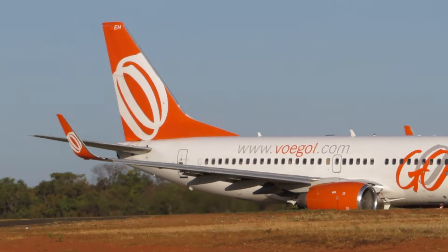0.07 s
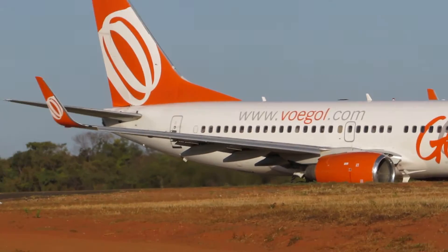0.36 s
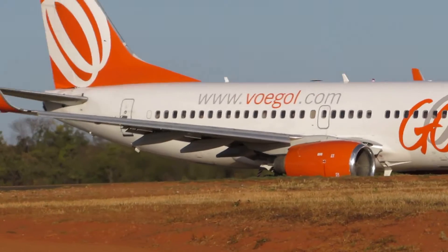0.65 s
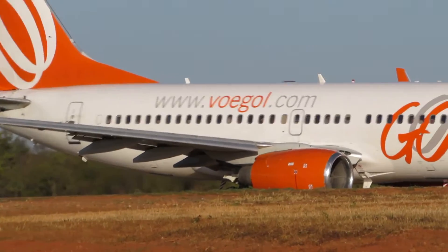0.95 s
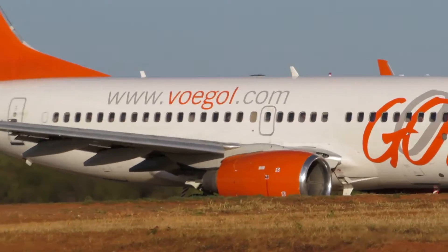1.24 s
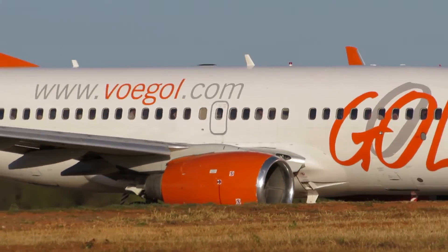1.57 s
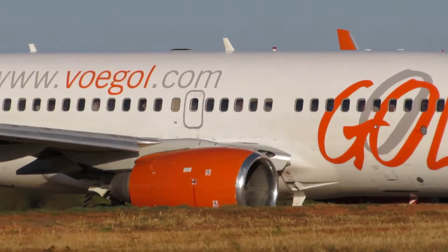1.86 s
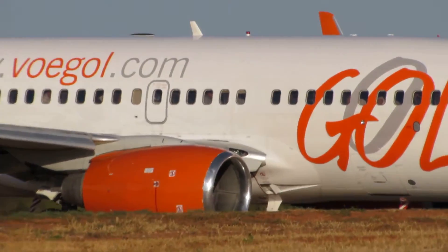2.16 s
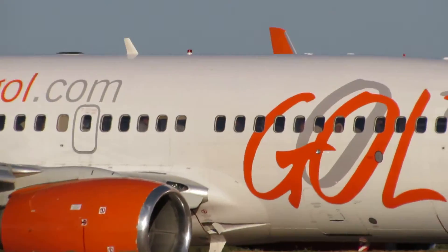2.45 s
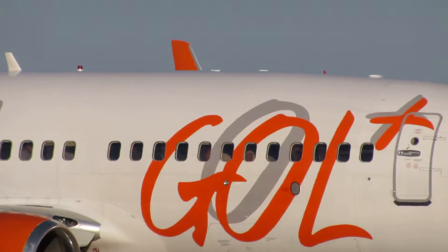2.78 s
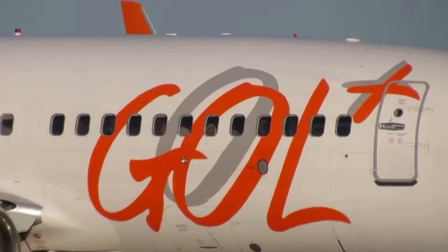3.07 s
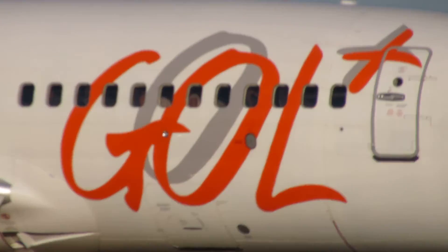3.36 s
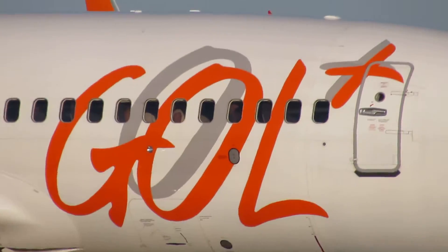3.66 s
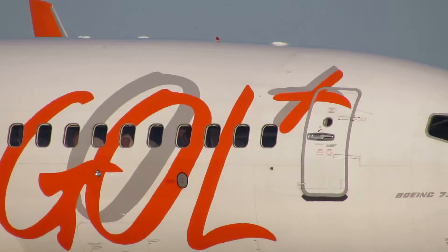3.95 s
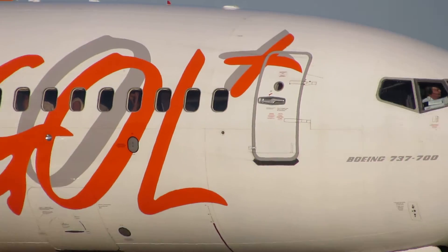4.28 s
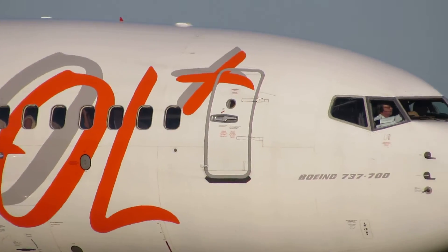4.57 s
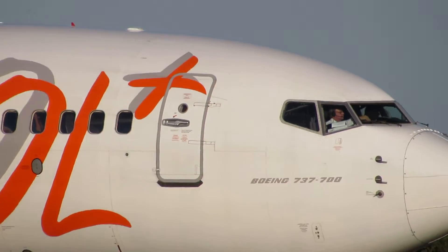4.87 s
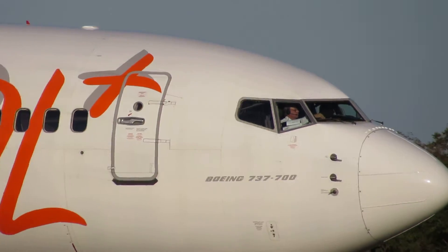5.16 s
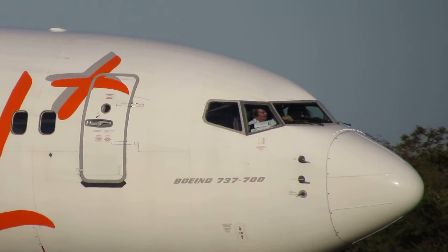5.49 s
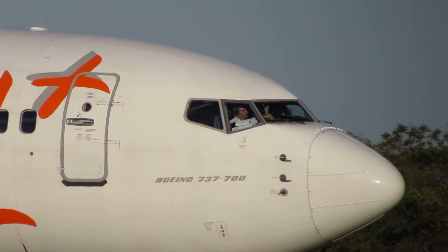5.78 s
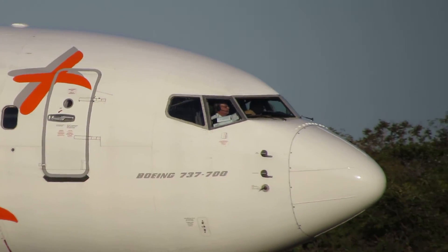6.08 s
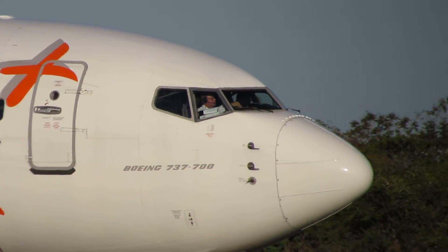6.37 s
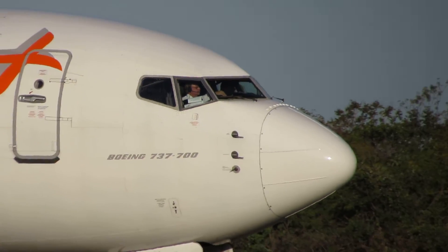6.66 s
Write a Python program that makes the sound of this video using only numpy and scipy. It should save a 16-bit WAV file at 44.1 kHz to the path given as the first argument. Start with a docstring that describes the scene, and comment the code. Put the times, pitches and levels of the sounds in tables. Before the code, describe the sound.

On an open airfield, a distant jet airliner roars with a faint turbine whine as gusts buffet a hand-held camera's microphone. The zoom motor whirrs and ticks close by. About three seconds in, two sharp clacks stop the motor and make the level drop suddenly. The sound creeps back with a few faint taps, a breathy fan howl crests, and the roar sinks under fresh gusts.

```python
"""On an airfield, a distant jet airliner heard through the two microphone ports of a hand-held camera.
From the start the engines roar under a faint turbine whine, gusts buffet the ports, and the zoom motor
whirrs and ticks close by. At 3.1 s a sharp clack makes the gain control duck; at 3.3 s a second one
stops the motor. The level creeps back as a loose part taps lightly. The fans' howl crests near 5.3 s,
then the roar sinks under fresh gusts and a few tiny high ticks."""
import sys
import numpy as np
from scipy import signal
from scipy.fft import rfft, irfft, next_fast_len
from scipy.io import wavfile
from scipy.ndimage import uniform_filter1d, map_coordinates

SR = 44100
rng = np.random.default_rng(int(sys.argv[2]) if len(sys.argv) > 2 else 0)


def transcribe(signal):
    """Save signal, clipped to [-1, 1], as a 16-bit WAV file at the path in sys.argv[1]."""
    frames = np.atleast_2d(signal).T
    limited = np.clip(frames, -1, 1)
    pcm = np.round(limited * 32767).astype(np.int16)
    wavfile.write(sys.argv[1], SR, pcm)


N = 301203


def amp(db):
    """Decibels to gain."""
    return 10 ** (np.asarray(db) / 20)


def unit(x):
    """Scale to rms 1."""
    return x / np.sqrt(np.mean(x ** 2) + 1e-20)


def along(points, hz):
    """Read (Hz, value) points on a log frequency axis."""
    freqs, values = np.transpose(points)
    return np.interp(np.log(hz + 1), np.log(freqs + 1), values)


def curve(points):
    """Join (seconds, value) points into one value per sample."""
    return np.interp(np.arange(N) / SR, *np.transpose(points))


def wobble(rate):
    """A smooth random curve, rate knots a second."""
    return map_coordinates(rng.standard_normal(int(N * rate / SR) + 4), [np.arange(N) * rate / SR])


def filtered(x, response):
    """Shape x by a gain that is a function of Hz."""
    size = next_fast_len(N + SR // 2)
    return irfft(rfft(x, size) * response(np.fft.rfftfreq(size, 1 / SR)), size)[..., :N]


def pan(side_db):
    """Left and right gains for a level difference, left over right."""
    side_db = np.atleast_1d(side_db)
    return amp(np.array([side_db, -side_db]) / 2)


def noise(patchy_db):
    """White noise with drifting patches of gain."""
    cells = signal.stft(rng.standard_normal(N), nperseg=512)[2]
    patches = uniform_filter1d(rng.standard_normal(cells.shape), size=4, axis=0)
    patches = unit(uniform_filter1d(patches, size=16, axis=1))
    return signal.istft(cells * amp(patchy_db * patches), nperseg=512)[1][:N]


def stereo_noise(spectrum, width, locked, patchy_db):
    """Noise of rms 1; a locked share of the side lags the mid a quarter cycle, so the right port leads."""
    common = noise(patchy_db)
    lagging = np.imag(signal.hilbert(common, next_fast_len(N)))[:N]
    apart = np.sqrt(locked) * lagging + np.sqrt(1 - locked) * noise(patchy_db)
    mid = filtered(common, lambda hz: amp(along(spectrum, hz)))
    side = filtered(apart, lambda hz: amp(along(spectrum, hz) + along(width, hz)))
    return unit(np.array([mid + side, mid - side]))


def coloured(x, resonances):
    """Peaks and dips, heard differently at each port."""
    def response(hz):
        return amp(sum(np.outer([left_db, right_db], 1 / (1 + (2 * (hz - centre) / width) ** 2))
                       for centre, width, left_db, right_db in resonances))
    return filtered(x, response)


def add(track, start, sound):
    """Mix a short sound in at start seconds."""
    part = track[..., round(start * SR):][..., :sound.shape[-1]]
    part += sound[..., :part.shape[-1]]


# The roar swelling and sinking across the airfield. Each row: time in seconds, swell in dB.
ROAR_SWELL = [(0.1, -4), (0.36, -0.2), (0.72, -1.64), (1.48, 0.5), (1.98, -1.5), (2.35, 0), (2.95, 0),
              (3.6, 0.5), (4.05, -4), (4.5, -4.6), (4.85, -2.5), (5.27, -1), (5.45, -2.5), (5.78, -7),
              (6.05, -8), (6.52, -5.5), (6.8, -8)]
# Exhaust rumble and jet rush from afar. Each row: frequency in Hz, relative density in dB.
RUMBLE_SPECTRUM = [(13, -42.5), (22, -24), (59, -3), (90, -4), (122, -1), (193, -3), (332, -11.5),
                   (364, -15.5), (520, -28), (680, -56), (1140, -120)]
RUSH_SPECTRUM = [(240, -29), (400, -6.5), (450, -4), (514, -2.5), (744, 2.5), (916, -8.5), (1190, -5),
                 (1860, -16), (2040, -14), (3030, -23), (3960, -32), (4260, -27.5), (5900, -31),
                 (8060, -40.5), (13700, -50)]
# Their stereo width at the microphone. Each row: frequency in Hz, side over mid in dB.
RUMBLE_WIDTH = [(50, -24.5), (150, -14), (400, 6.5)]
RUSH_WIDTH = [(400, 3), (640, -2), (820, 7), (1150, -1), (1420, -1.5), (1780, 8.5), (2080, 8), (2300, 5),
              (3250, 11), (3550, 9.5), (4300, 0.5), (6000, 0.5), (9000, -1)]
# The rush arrives from the right. Each row: frequency in Hz, left over right in dB.
RUSH_PAN = [(450, -8.5), (750, 3.5), (1100, 0.5), (1600, -2), (2600, -6), (3200, -4.5), (4200, -3.5),
            (9000, 0)]
# The camera's body colours the rush. Each row: centre and width in Hz, left and right lift in dB.
BODY_RESONANCES = [(583, 74, 1.5, 2.5), (676, 90, -3.5, 0.5), (1160, 220, -3, 3.5), (1430, 100, 0.5, 1.5),
                   (1710, 420, 3.5, 0), (1920, 280, -4, -2), (2300, 150, 1.5, -0.5), (2540, 200, -5.5, 0.5),
                   (2760, 160, 2, 1), (3060, 160, 4, 3), (3226, 160, -13, -6), (3510, 200, 4.5, 2),
                   (4060, 180, 4, 2), (5170, 300, -3, 0)]


def engines(rumble_db=-21.5, rush_db=-27, rumble_swing=1.51, dulling=0.52, clear_db=-2):
    """Distant exhaust rumble and jet rush; the air carries the treble better when the rush swells."""
    swell_db = curve(ROAR_SWELL)
    rumble_gain = amp(rumble_db + rumble_swing * swell_db + 0.9 * wobble(10))
    rumble = stereo_noise(RUMBLE_SPECTRUM, RUMBLE_WIDTH, locked=0.61, patchy_db=-0.17)
    rush = stereo_noise(RUSH_SPECTRUM, RUSH_WIDTH, locked=0.54, patchy_db=1.0)
    treble = filtered(rush, lambda hz: hz ** 2 / (hz ** 2 + 2400 ** 2))
    treble_gain = amp(dulling * np.minimum(swell_db - clear_db, 0))
    rush = rush + treble * (treble_gain - 1)
    rush = filtered(rush, lambda hz: pan(along(RUSH_PAN, hz)))
    rush_gain = amp(rush_db + swell_db + 0.41 * wobble(15) + 0.59 * wobble(90))
    return rumble_gain * rumble + rush_gain * coloured(rush, BODY_RESONANCES)


# Far-off turbine tones, a little to the right. Each row: pitch in Hz, relative level in dB,
# swing in dB per dB of the roar's swell, slow wander in Hz.
TURBINE_TONES = [(2260, -66.5, 2.5, 16), (2690, -52, 4, 22), (3094, -61, 2, 24), (5600, -70.5, 1.3, 3.5),
                 (6013, -67, 1.25, 4), (6700, -72, .9, 4)]


def turbine_whine(gain_db=8.5, right_lead_rad=2.15):
    """Blade tones, wavering and fading in the turbulent air."""
    swell_db = curve(ROAR_SWELL)
    waver = 1 + 0.0004 * wobble(3) + 0.00093 * wobble(70)
    tones = np.zeros((2, N))
    for hz, db, swing, wander_hz in TURBINE_TONES:
        pitch_hz = hz * waver + wander_hz * wobble(1.8) + 9 * wobble(60)
        phase = 2 * np.pi * np.cumsum(pitch_hz) / SR
        gain = amp(db + swing * swell_db + 1.3 * wobble(7.3))
        tones += gain * np.sin([phase, phase + right_lead_rad])
    return tones * amp(gain_db) * pan(-2)


# Gusts right on the microphone. Each row: start and length in seconds, strength over the breeze
# in dB, left over right in dB.
WIND_GUSTS = [(-.08, 0.034, 19.5, 9.5), (0.275, 0.46, 16, 9.5), (0.657, 0.093, 16.5, 16.5),
              (.85, 1.38, 15, 7.5), (2.35, 0.81, 13, 2), (4.128, 0.32, 15, -3.5), (4.5, 1, 12.5, -1),
              (5.216, 1.13, 19.5, -3), (6.417, 0.54, 19.5, -2.5)]


def gusts(attack_s=0.053, release_s=0.29):
    """Wind strength and left-right lean in dB; gusts rise, hold and die away, and the strongest leads."""
    t = np.arange(N) / SR
    start, length, db, side_db = np.transpose(WIND_GUSTS)[:, :, None]
    rise = np.clip((t - start) / attack_s, 0, 1)
    fall = np.exp(-np.maximum(t - start - length, 0) / release_s)
    push = amp(db) * rise * fall
    strength_db = 10 * np.log10(1 + np.max(push, axis=0) ** 2)
    lean_db = np.sum(push * side_db, axis=0) / (1 + np.sum(push, axis=0))
    return strength_db, lean_db


# Single eddies striking the ports. Each row: time in seconds, buffet lift in dB, flutter lift in dB.
PORT_EDDIES = [(.37, -2, 10.5), (.56, 8.5, 2), (1.0, 3, 6), (1.45, 8, 10), (2.32, -2, 13), (2.46, 11, 0),
               (3.075, 0.5, 10), (4.295, 4.5, -3.5), (4.495, 5, 7), (5.33, 8, -7), (5.39, 1, 0),
               (5.455, 6, -1), (5.54, 13.5, 4), (5.6, 7, 7), (5.713, -2, 11), (5.81, 0, 4.5),
               (5.878, 6, 8.5), (5.955, -4, 7.5), (6.05, -3, 8.5), (6.16, -5, 0), (6.24, -2, 7.5),
               (6.295, 11, 2), (6.48, 11, -3), (6.545, 2, 6.5), (6.62, -4, 2), (6.755, 11, 8.5),
               (6.82, 2, 9)]


def eddies(half_passage_s=0.015):
    """Brief lifts in dB of the buffeting and of the flutter as each eddy passes."""
    times, *lifts_db = np.transpose(PORT_EDDIES)
    passing = np.exp(-((np.arange(N) / SR - times[:, None]) / half_passage_s) ** 2)
    return np.array(lifts_db) @ passing


# Wind noise made at the ports themselves. Each row: frequency in Hz, relative density in dB.
BUFFET_SPECTRUM = [(15, -5.5), (30, -14.5), (65, -2), (110, -0.5), (170, -22.5), (400, -39), (1000, -100)]
FLUTTER_SPECTRUM = [(50, -30), (130, -2.5), (200, 3), (330, -4), (600, -15.5), (1200, -36.5), (3000, -79),
                    (8000, -73)]
# Its stereo width. Each row: frequency in Hz, side over mid in dB.
WIND_WIDTH = [(30, 19), (300, 13.1), (1000, 9.8)]


def wind(buffet_lull_db=-38.5, flutter_lull_db=-56.5, flutter_growth=1.78):
    """Slow eddies thump the ports in opposite phase; faster air adds a higher flutter."""
    gust_db, lean_db = gusts()
    thump_db, flap_db = eddies()
    buffet_gain = amp(buffet_lull_db + gust_db + thump_db + 0.77 * wobble(35))
    buffet = stereo_noise(BUFFET_SPECTRUM, WIND_WIDTH, locked=0, patchy_db=1.0)
    flutter_gain = amp(flutter_lull_db + flutter_growth * gust_db + flap_db + 0.54 * wobble(25))
    flutter = stereo_noise(FLUTTER_SPECTRUM, WIND_WIDTH, locked=0.1, patchy_db=-0.5)
    return (buffet_gain * buffet + flutter_gain * flutter) * pan(lean_db)


# The zoom motor, in the same body as the microphone. Each row: time in seconds, relative level in dB.
MOTOR_LEVEL = [(.06, -43), (.33, -39), (.95, -40), (1.35, -35.5), (2.0, -37.5), (3.1, -38.5)]
# Its gear noise. Each row: frequency in Hz, relative density in dB.
MOTOR_SPECTRUM = [(220, -3), (320, 14.5), (420, 10), (800, 5.5), (1100, -8), (1500, 7.5), (2800, -2.5),
                  (4200, -16.5), (7200, -14.5), (8800, -20), (9800, -17.5), (11300, -27), (14000, -37.5)]
# Its stereo width. Each row: frequency in Hz, side over mid in dB.
MOTOR_WIDTH = [(400, 8.7), (1100, 6.2), (1800, 6.4), (3500, 1.8), (4500, 5.6), (9000, 0.5)]
# It is mostly louder at the left port. Each row: frequency in Hz, left over right in dB.
MOTOR_PAN = [(1000, 8), (2500, -3.5), (4500, 8.5), (8500, 13.5), (11000, 1.5)]


def zoom_motor(turn_hz=39.9, stop_s=3.287, gain_db=8.0):
    """Gear noise that throbs with each turn, until the lever is let go."""
    t = np.arange(N) / SR
    angle = 2 * np.pi * turn_hz * t
    throb = 1 + 0.083 * np.sin(angle) - 0.13 * np.cos(2 * angle)
    running = np.clip((stop_s - t) / 0.0057, 0, 1)
    whirr = stereo_noise(MOTOR_SPECTRUM, MOTOR_WIDTH, locked=0.39, patchy_db=1.5)
    whirr = filtered(whirr, lambda hz: pan(along(MOTOR_PAN, hz)))
    return amp(curve(MOTOR_LEVEL) + gain_db) * throb * running * whirr


# The lens mechanism catching, close to the ports. Each row: start in seconds, relative level in dB.
LENS_CATCHES = [(.005, -18), (0.2892, -31), (.4145, -26), (0.54, -24.5), (0.567, -32), (.6649, -28),
                (0.6905, -30), (.7911, -26.5), (.8116, -28), (1.494, -26), (1.667, -22.5), (1.6931, -26),
                (2.167, -22.5), (2.1935, -27), (2.2658, -15), (2.417, -19), (2.4755, -25), (2.5432, -16.5),
                (2.6063, -22.5), (2.6687, -12.5), (2.743, -25), (2.7931, -15)]
# The tone all catches share. Each row: frequency in Hz, gain in dB.
CATCH_TONE = [(300, -58), (1450, 13.5), (2200, 0.5), (3100, 4.5), (4200, -2), (5300, -3), (6500, -3),
              (7700, 1), (12000, -19), (15000, -30.5)]
# They sit nearer the left port. Each row: frequency in Hz, left over right in dB.
CATCH_PAN = [(1500, 9), (5000, 12), (8500, 9), (10500, 4), (12500, -6)]


def lens_ticks(t60=0.027, attack_s=0.00048, grit_db=4, colour_db=2.5):
    """Short gritty catches of the moving lens, each with its own colour."""
    track, t = np.zeros((2, N)), np.arange(SR // 20) / SR
    for start, db in LENS_CATCHES:
        roughness = amp(grit_db * rng.standard_normal(len(t)))
        hiss = rng.standard_normal(len(t)) + 1.3 * rng.standard_normal((2, len(t)))
        spectrum = rfft(roughness * hiss)
        colour = unit(uniform_filter1d(rng.standard_normal(spectrum.shape[1]), size=40))
        grit = unit(irfft(spectrum * amp(colour_db * colour), len(t)))
        envelope = amp(db - 60 * t / t60) * (1 - np.exp(-t / attack_s))
        add(track, start, envelope * grit)
    return filtered(track, lambda hz: amp(along(CATCH_TONE, hz)) * pan(along(CATCH_PAN, hz)))


# The lens housing, heard at each port. Each row: centre and width in Hz, left and right lift in dB.
HOUSING_RESONANCES = [(2300, 110, -3, -7), (3110, 120, 4.5, -3.5), (3770, 160, 4.5, 6),
                      (5070, 400, 6.5, 2.5), (5900, 160, 4.5, -8.5), (7620, 280, 1, 5.5),
                      (9900, 410, 4.5, 0.5), (12380, 900, 2.5, 7)]


def zoom_lens():
    """The lens housing rings under the motor and the ticks."""
    return coloured(zoom_motor() + lens_ticks(), HOUSING_RESONANCES)


# Zoom lever and fingers knocking on the camera; the last two rows are the loose part striking the body. Each
# row: start in seconds, relative level in dB, # low cut in Hz, high cut in Hz (higher for a harder blow).
KNOCKS = [(.0055, -8, 400, 1490), (3.1217, 6.5, 150, 12000), (3.1275, 8, 400, 2610), (3.143, 6, 900, 1500),
          (3.286, -1, 1000, 9100), (3.2892, 13.5, 640, 800), (3.347, 3, 696, 600), (3.356, 1.5, 703, 590),
          (3.7768, -19.5, 1500, 6960), (3.86, -23, 1500, 7000)]
# The plastic shell around the microphone. Each row: mode in Hz, level in dB, 60 dB decay in seconds.
SHELL_MODES = [(290, -19, 0.027), (790, -11, .035), (1050, -10, 0.03), (1223, -6, 0.029), (1473, -5, 0.031),
               (1870, -15, 0.068), (2234, 2.5, 0.012), (2620, -12.5, 0.05), (2940, -14, 0.03),
               (3740, -12.5, 0.03), (4270, -14.5, 0.03), (5300, -2.5, 0.0099), (6500, -16, .012)]
# The knocks land to the left. Each row: frequency in Hz, left over right in dB.
KNOCK_PAN = [(800, 12.5), (2200, 8), (5500, 10.5), (12000, 0)]


def clacks(gain_db=-8.5, crack_db=-7, crack_t60=0.0086, tail_db=-27, tail_t60=0.048):
    """Blows crack and ring the shell; a soft one reaches only the low modes, a light one only the high."""
    track, t = np.zeros((2, N)), np.arange(SR // 6) / SR
    arrival = t - np.array([[0.00011], [0]])  # the ring reaches the left port a moment later
    ring = sum((-1) ** k * amp(db - 60 * t / t60) * np.sin(2 * np.pi * hz * arrival)
               for k, (hz, db, t60) in enumerate(SHELL_MODES))
    ring *= 1 - np.exp(-t / 0.00018)
    crack_envelope = amp(crack_db - 60 * t / crack_t60) + amp(tail_db - 60 * t / tail_t60)
    for start, db, low_hz, high_hz in KNOCKS:
        crack = crack_envelope * rng.standard_normal((2, len(t)))
        high_cut = signal.butter(2, high_hz, fs=SR)
        low_cut = signal.butter(3, low_hz, "high", fs=SR)
        blow = signal.lfilter(*high_cut, ring + crack)
        add(track, start, amp(db + gain_db) * signal.lfilter(*low_cut, blow))
    return filtered(track, lambda hz: pan(along(KNOCK_PAN, hz)))


# Something loose on the camera, close and a little left. Each row: start in seconds, level in dB.
LOOSE_TAPS = [(3.78, -24), (3.859, -34), (4.152, -32), (4.361, -33), (4.485, -32)]


def taps(hz=1850, t60=0.039, attack_s=0.0013):
    """A small loose part touches the body now and then, ringing one note."""
    track, t = np.zeros((2, N)), np.arange(SR // 10) / SR
    for start, db in LOOSE_TAPS:
        envelope = amp(db - 60 * t / t60) * (1 - np.exp(-t / attack_s))
        add(track, start, envelope * np.sin(2 * np.pi * hz * t))
    return track * pan(3)


# The engine fans' breathy howl, far off. Each row: frequency in Hz, relative density in dB.
HOWL_SPECTRUM = [(1900, -54), (2350, -8), (2600, 6), (2850, -4), (3150, -12.5), (3600, -50.5)]
# The howl as the intakes come into line. Each row: time in seconds, level in dB.
HOWL_LEVEL = [(4.3, -67), (5.0, -58), (5.25, -46), (5.6, -63)]


def fan_howl():
    """A narrow band of fan noise that crests as the intakes point at the camera."""
    gain = amp(curve(HOWL_LEVEL) + 1.3 * wobble(21))
    howl = stereo_noise(HOWL_SPECTRUM, width=[(2600, 5.2)], locked=0.54, patchy_db=1)
    return gain * howl * pan(-1.5)


# Faint ticks at both ports. Each row: start in seconds, relative level in dB, low cut in Hz.
HIGH_TICKS = [(5.7125, -49, 4000), (5.8874, -44, 4500), (5.9109, -54, 9000), (6.178, -58, 9000),
              (6.2943, -37, 10200)]


def high_ticks(t60=0.012, gain_db=-4):
    """Tiny dry ticks at the very top of the treble."""
    track, t = np.zeros((2, N)), np.arange(SR // 30) / SR
    for start, db, low_hz in HIGH_TICKS:
        low_cut = signal.butter(6, low_hz, "high", fs=SR, output="sos")
        burst = amp(db + gain_db - 60 * t / t60) * rng.standard_normal((2, len(t)))
        add(track, start, signal.sosfilt(low_cut, burst))
    return track


def scene():
    """The airliner far off, the wind on the ports and the camera's own noises up close."""
    airliner = engines() + fan_howl() + turbine_whine()
    return airliner + wind() + zoom_lens() + clacks() + taps() + high_ticks()


def gain_control(x, threshold_db=-18, slope=9, depth_db=24, hold_s=0.044, release_db_per_s=26.0,
                 attack_s=0.0094):
    """A burst above the bass pulls the gain down fast; after a short hold it climbs back steadily."""
    t = np.arange(N) / SR
    sensed = filtered(x, lambda hz: hz ** 2 / (hz ** 2 + 900 ** 2))
    power = uniform_filter1d(np.mean(sensed ** 2, axis=0), size=512, origin=255)
    level_db = 10 * np.log10(np.abs(power) + 1e-12)
    wanted_db = np.clip(slope * (level_db - threshold_db), 0, depth_db)
    # the deepest cut so far, wearing off with time
    cut_db = np.maximum.accumulate(wanted_db + release_db_per_s * t) - release_db_per_s * t
    held_db = np.maximum(cut_db, np.interp(t - hold_s, t, cut_db))
    step = 1 / (attack_s * SR)
    return x * amp(-signal.lfilter([step], [1, step - 1], held_db))


# Narrow notches the camera cuts against its zoom motor's noise. Each row: centre in Hz, width in Hz.
MOTOR_NOTCHES = [(3925, 180), (7870, 310)]


def record(dry, top_hz=14300):
    """The camera's chain: notch filters, gain control, clipping at full scale and the band limit."""
    def dips(hz):
        return np.prod([(centre ** 2 - hz ** 2) / (centre ** 2 - hz ** 2 + 1j * hz * width)
                        for centre, width in MOTOR_NOTCHES], axis=0)
    ducked = gain_control(filtered(dry, dips))
    return filtered(np.clip(ducked, -1, 1), lambda hz: 1 / (1 + (hz / top_hz) ** 60))


dry = scene()
out = record(dry)
transcribe(out)
```